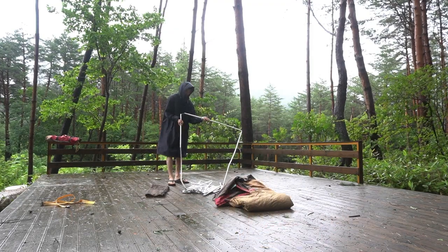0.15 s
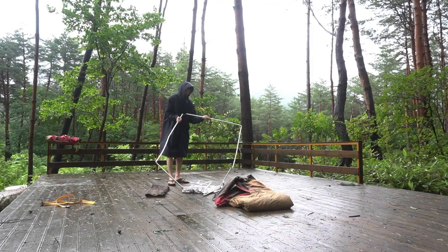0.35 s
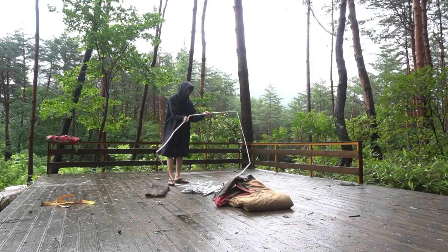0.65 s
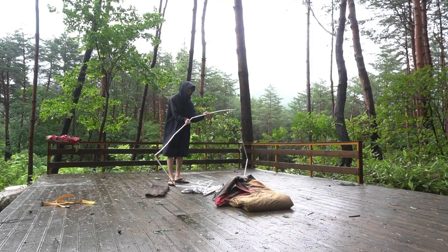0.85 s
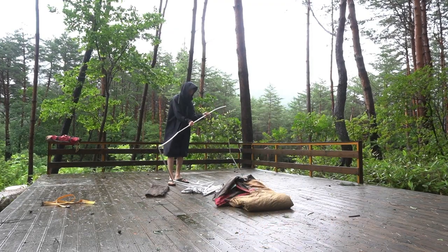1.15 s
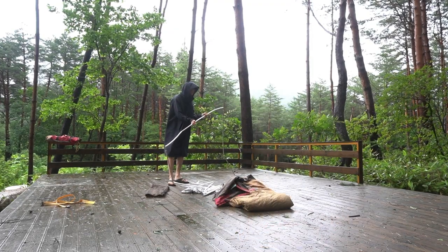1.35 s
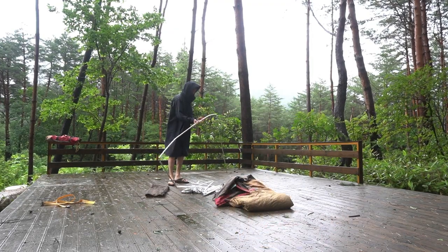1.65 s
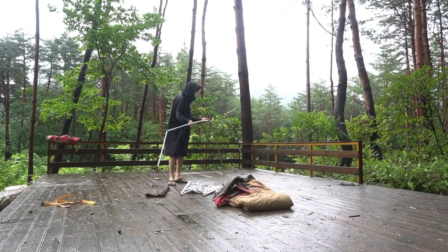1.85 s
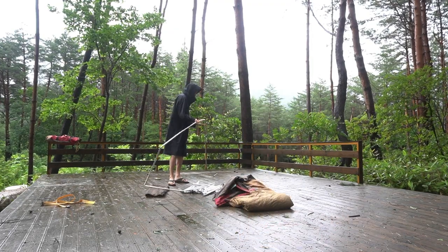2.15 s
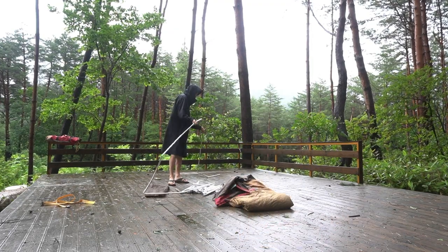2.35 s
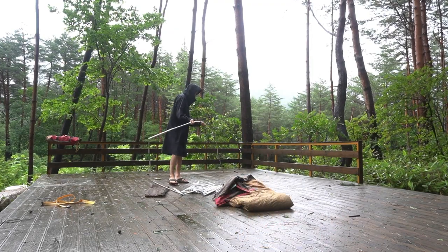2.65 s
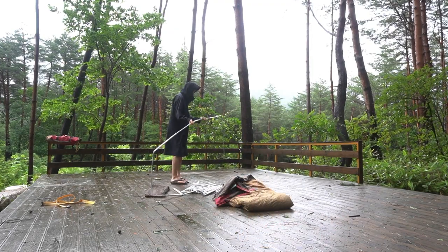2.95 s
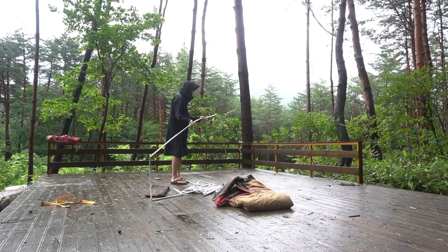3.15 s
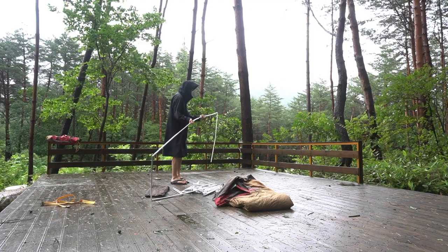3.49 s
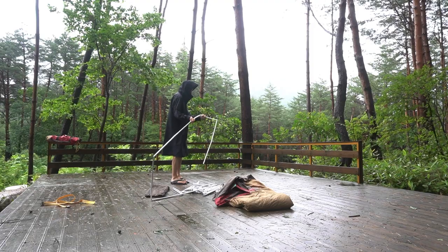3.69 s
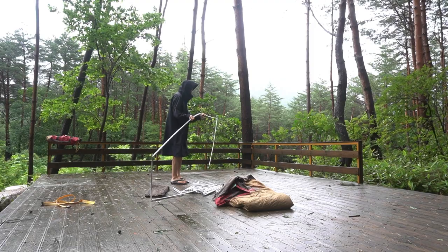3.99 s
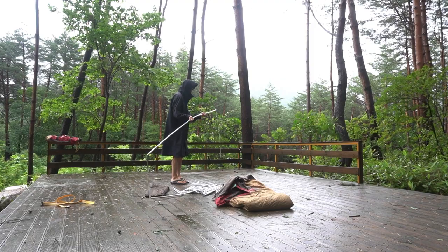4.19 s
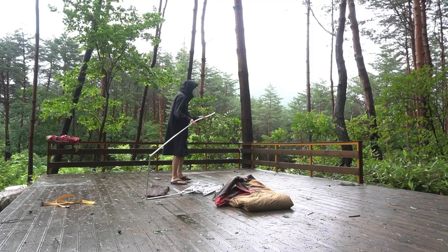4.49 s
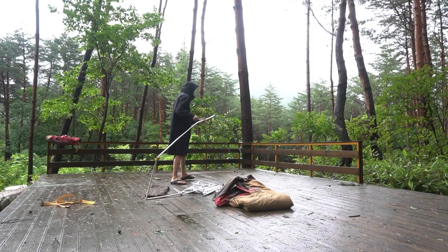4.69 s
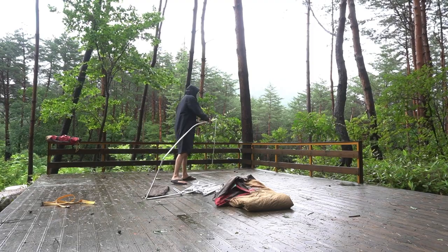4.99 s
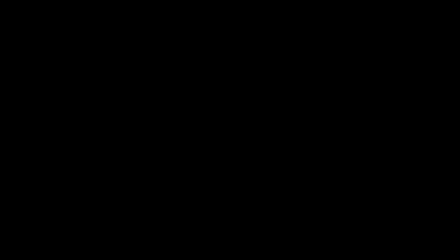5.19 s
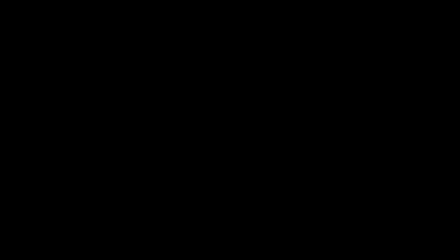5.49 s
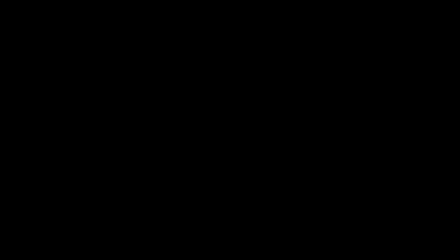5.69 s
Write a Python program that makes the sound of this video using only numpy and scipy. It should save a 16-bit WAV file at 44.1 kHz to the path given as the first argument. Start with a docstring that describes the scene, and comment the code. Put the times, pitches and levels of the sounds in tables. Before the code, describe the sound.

Even rain continues throughout, wide and diffuse. Bright tubular clicks come in quick irregular clusters, then a heavier clattering knock on hollow boards near the start, more ticks and snaps, firm knocks around three seconds, and one late clack before it thins out. Short dry scrapes link the contacts. Single drops slap wet wood close to the microphone, left and right, in an open wooded place with little reverberation.

```python
"""Steady rain on a forest and a wet wooden deck; single drops land close to the listener.
A few metres away a folding aluminium tent pole is put together: sections scrape, snap into sleeves and knock on boards.
Rain is coloured noise plus random damped pings; near drops are short decaying tones, spray and wood taps.
Scrapes are dense random slips, contacts are noise bursts exciting tube and board modes, the deck is resonant noise.
Noise responses convolved with the contacts make the metal ring on and the trees throw back a soft tail."""
import sys
import numpy as np
from scipy import signal
from scipy.fft import rfft, irfft
from scipy.io import wavfile

SR = 44100
rng = np.random.default_rng(int(sys.argv[2]) if len(sys.argv) > 2 else 0)


def wav_out(sig):
    """Save sig, one row per channel (or a flat mono array), as 16-bit PCM at SR to the path in sys.argv[1]."""
    wavfile.write(sys.argv[1], SR, np.round(np.clip(np.atleast_2d(sig).T, -1, 1) * 32767).astype(np.int16))


N = 257268
TIME = np.arange(N) / SR  # s

# normal modes of the aluminium tubes: (frequency [Hz], bandwidth [Hz], relative level [dB])
TUBE_MODES = [(1160, 83, -18), (2914, 950, 3), (4050, 480, 2), (6005, 120, 1), (7875, 230, 8.5),
              (9640, 340, 6), (11600, 220, -30), (14900, 410, 4.5), (14200, 440, 7.5), (15200, 520, -5.5)]
# normal modes of the deck boards: (frequency [Hz], bandwidth [Hz], relative level [dB])
BOARD_MODES = [(96, 8.9, -5), (243, 47, 7.5), (391, 77, 8), (494, 18, 7), (630, 120, 3.5), (1040, 130, -4),
               (1302, 86.7, 0.5)]
# likeness of left and right in sound from all round: (frequency [Hz], correlation [-1 to 1])
RAIN_CORRELATION = [(100, 0.98), (300, 0.98), (600, 0.93), (1200, 0.66), (2500, 0.48), (5000, 0.14),
                    (14000, 0.11)]
# likeness of left and right in the pole's sound: (frequency [Hz], correlation [-1 to 1])
POLE_CORRELATION = [(200, 1), (1200, 1), (4000, 0.67), (11000, .6)]
# edges of the thud, body, clack and ting registers: (frequency [Hz])
REGISTER_EDGES = [140, 700, 2400, 6500, 16500]
# a section drawn along its neighbour or into its sleeve: (time [s], length [s], relative level [dB])
SLIDING_STROKES = [(0.324, 0.19, -36), (0.599, 0.54, -40.5), (1.175, 0.21, -37.5), (1.371, 0.073, -30),
                   (1.516, .12, -43), (1.788, .07, -34.5), (1.9, 0.11, -48), (2.203, .16, -41),
                   (2.52, .13, -42), (2.667, 0.07, -38), (3.79, 0.13, -48), (4.168, .38, -43),
                   (4.627, 0.47, -51)]


def from_db(db):
    """Logarithmic level: 20 dB is a tenfold amplitude."""
    return 10 ** (np.asarray(db) / 20)


def rms_one(x):
    """Power normalisation: scale to unit root mean square."""
    return x / np.sqrt(np.mean(x ** 2) + 1e-20)


def at_hz(points, hz):
    """Logarithmic pitch scale: interpolate a table over log frequency."""
    frequency, value = np.transpose(points)
    return np.interp(np.log(np.maximum(hz, 1)), np.log(frequency), value)


def level(rows):
    """Amplitude envelope: gain over time from a curve in dB."""
    return from_db(np.interp(TIME, *np.transpose(rows)))


def band(x, low, high):
    """Causal band-pass filtering between two frequencies."""
    edges = [low, min(high, .47 * SR)]
    return signal.sosfilt(signal.butter(2, edges, "band", fs=SR, output="sos"), x)


def colour(x, spectrum):
    """Spectral shaping: weight each Fourier component by a gain in dB."""
    size = x.shape[-1]
    gain = from_db(at_hz(spectrum, np.fft.rfftfreq(size, 1 / SR)))
    return irfft(rfft(x) * gain, size)


def widen(pair, alike):
    """Interaural correlation: a sum and a difference of two unrelated signals set the likeness of the channels."""
    alike = np.clip(alike, 0, .999)
    common = np.sqrt(1 + alike) * pair[0]
    opposed = np.sqrt(1 - alike) * pair[1] * np.array([[1], [-1]])
    return common + opposed


def diffuse(pair, likeness):
    """Diffuse field: the correlation of the channels varies with frequency."""
    size = pair.shape[-1]
    alike = at_hz(likeness, np.fft.rfftfreq(size, 1 / SR))
    return irfft(widen(rfft(pair), alike), size)


def resonate(x, modes):
    """Modal superposition: parallel two-pole resonances, each damped according to its bandwidth."""
    out = 0
    for hz, width, db in modes:
        radius = np.exp(-np.pi * width / SR)
        zeros = np.array([1, 0, -1]) * (1 - radius * radius) / 2
        poles = [1, -2 * radius * np.cos(2 * np.pi * hz / SR), radius * radius]
        out = out + from_db(db) * signal.lfilter(zeros, poles, x)
    return out


def at_level(x, db):
    """Energy normalisation: the energy of a short sound, spread over 10 ms, sets its level."""
    return from_db(db) * x / np.sqrt(np.sum(x ** 2) / (2 * SR / 100) + 1e-20)


def add(out, s, sound, pan_db):
    """Level-difference stereophony: place a short sound in time, further left for a positive pan."""
    i = int(s * SR)
    panned = sound * from_db([[pan_db / 2], [-pan_db / 2]])
    out[:, i:i + sound.shape[1]] += panned[:, :N - i]


def pings(per_s, spread_db, sharpness):
    """Shot noise: two streams of random impacts, mostly small, each exciting one of twelve damped resonances."""
    sizes = from_db(spread_db * np.minimum(rng.exponential(1, (2, N)), 4)) * rng.choice([-1, 1], (2, N))
    impacts = sizes * (rng.random((2, N)) < per_s / SR)
    pitches = np.geomspace(450, 14000, 12)  # Hz
    dealt = rng.integers(0, len(pitches), (2, N))
    out = 0
    for k, hz in enumerate(pitches):
        own_impacts = impacts * (dealt == k) + 1e-18  # the offset keeps the filter clear of denormals
        out = out + resonate(own_impacts, [(hz, hz / sharpness, -10 * np.log10(hz))])
    return out


def swells(rows, attack_s, release_s):
    """Incoherent addition: overlapping events (time [s], length [s], level [dB]) add in power."""
    power = 0
    for s, length, db in rows:
        rise = np.clip((TIME - s) / attack_s, 0, 1)
        fall = np.exp(-np.maximum(TIME - s - length, 0) / release_s)
        power = power + (from_db(db) * rise * fall) ** 2
    return np.sqrt(power)


def rain(wash_db, patter_db):
    """Superposition of random impacts: far drops merge into a wash, nearer ones patter on leaves and boards."""
    # strength of the rainfall: (time [s], relative level [dB])
    rainfall = [(0, -40.5), (1, -39.5), (2, -39.5), (3, -41), (5.2, -41.5)]
    # spectrum of the far wash: (frequency [Hz], relative level per Hz [dB])
    wash_spectrum = [(24, -73), (40, -40.5), (130, -17), (167, -19), (199, -12), (297, -8), (363, -5),
                     (433, -6.5), (491, -2.5), (697, -1), (1300, -4), (2210, -3.5), (9450, -19),
                     (13800, -19.5), (16000, -23.5)]
    # weighting of the nearer patter: (frequency [Hz], gain [dB])
    patter_spectrum = [(400, -5.5), (900, -2.5), (2200, -4), (5000, -1), (14000, -12.5)]
    far = colour(rng.standard_normal((2, N)), wash_spectrum)
    near = colour(pings(per_s=1400, spread_db=4, sharpness=1.7), patter_spectrum)
    mixed = from_db(wash_db) * rms_one(far) + from_db(patter_db) * rms_one(near)
    return level(rainfall) * diffuse(mixed, RAIN_CORRELATION)


def near_drops(cycles, splash_db, splash_s, gain_db, tap_s, tap_db):
    """Damped oscillation: a drop slaps the water film, throws a little spray and taps the wood beneath."""
    # (time [s], relative slap level [dB], slap pitch [Hz], relative wood tap level [dB], left over right [dB])
    near_drop_rows = [(0.295, -44, 7400.0, -46, 18), (0.9328, -31, 10200.0, -58, -1),
                      (2.2415, -26.5, 7400, -43, 2), (2.342, -33, 6330, -39, 8),
                      (3.023, -34, 6230, -31.5, -4), (3.4434, -37.5, 4860, -34.5, -1),
                      (3.5932, -36, 2600, -40, -5), (3.683, -52, 2700, -33, 12),
                      (3.7256, -30, 9350, -45, -9), (4.0087, -43.5, 3240, -42, -18),
                      (4.2088, -24.5, 8600, -42, -5), (4.603, -21.5, 8900, -33, 2),
                      (4.9948, -33.5, 11200, -47, 2), (5.155, -43, 7100, -38, -10),
                      (5.1936, -46, 1980, -37, -6)]
    out, t = np.zeros((2, N)), np.arange(SR // 25) / SR
    for s, db, hz, wood_db, pan_db in near_drop_rows:
        slap = np.sin(2 * np.pi * hz * t) * np.exp(-t * hz / cycles)
        spray = band(rng.standard_normal((2, len(t))), hz / 2, hz * 2) * np.exp(-t / splash_s)
        tap = widen(rng.standard_normal((2, len(t))), .9) * np.exp(-t / tap_s)
        on_water = at_level(slap + from_db(splash_db) * spray, db + gain_db)
        on_wood = at_level(band(tap, 500, 2100), wood_db + tap_db)
        add(out, s, on_water + on_wood, pan_db)
    return out


def deck(gain_db):
    """Forced resonance: the hollow deck booms at its board modes as weight shifts on it."""
    # steps and blows that set the deck booming: (time [s], relative level [dB])
    thumps = [(.34, -51), (.45, -52.5), (.78, -42), (.94, -52), (1.819, -43.5), (2.0, -58), (2.16, -55.5),
              (2.32, -53), (2.5, -51.5), (3.06, -52), (3.2, -60), (4.38, -56.5), (4.52, -62)]
    # weighting of the boom: (frequency [Hz], gain [dB])
    boom_spectrum = [(25, -24), (55, -8), (85, -3), (150, -1.5), (210, -11), (400, -18), (1500, -59)]
    hold_s = 0.038
    load = rng.standard_normal(N)
    weight = swells([(s, hold_s, db) for s, db in thumps], attack_s=0.029, release_s=.09)
    boom = colour(load + resonate(load, BOARD_MODES), boom_spectrum)
    return from_db(gain_db) * weight * rms_one(boom)


def sliding(gain_db, clump_db, tube_db):
    """Stick-slip friction: tube ends catch and slip in clumps, each slip with a colour of its own."""
    # weighting of the scrape: (frequency [Hz], gain [dB])
    scrape_spectrum = [(400, -30), (1200, -20.5), (2800, -2.5), (4500, 1.5), (7000, -1), (11500, -1.5),
                       (14500, 1.5), (16000, -2)]
    slips = pings(per_s=9000, spread_db=2.5, sharpness=1.5)
    knots = np.arange(0, TIME[-1], 1 / 70)  # s
    clumps = from_db(clump_db * np.interp(TIME, knots, rng.standard_normal(len(knots))))
    excited = slips + from_db(tube_db) * resonate(slips, TUBE_MODES)
    scrape = colour(excited, scrape_spectrum) * clumps
    strokes = swells(SLIDING_STROKES, attack_s=0.021, release_s=0.087)
    return from_db(gain_db) * strokes * rms_one(diffuse(scrape, POLE_CORRELATION))


def tail(x, response, t60, onset_s, gain_db):
    """Reverberation as convolution: a dense response builds up, then falls by 60 dB per t60 seconds."""
    t = np.arange(response.shape[1]) / SR
    response = response * from_db(-60 * t / t60) * (1 - np.exp(-t / onset_s))
    response = response / np.sqrt(np.sum(response ** 2) / 2)
    return from_db(gain_db) * signal.fftconvolve(x, response, axes=1)[:, :N]


def forest_echo(pole):
    """Diffuse scattering: the trunks throw back a soft, dense tail."""
    # weighting of the scattered sound: (frequency [Hz], gain [dB])
    forest_spectrum = [(70, -8), (150, -5), (400, -18), (1200, -9), (3000, 3), (7000, 1.5), (16000, -6)]
    trunks = diffuse(colour(rng.standard_normal((2, SR)), forest_spectrum), RAIN_CORRELATION)
    return tail(pole, trunks, t60=0.4, onset_s=0.0062, gain_db=-11.5)


def tube_ringing(pole):
    """Modal density: the linked sections share many close modes, which ring on in clusters."""
    clusters = resonate(rng.standard_normal((2, SR)), TUBE_MODES)
    return tail(pole, clusters, t60=0.24, onset_s=0.0071, gain_db=-14.5)


def contacts(rows, edges, modes, crack_db, chatter_db, focus_db, sharpness, snap_db):
    """Impact excitation: a snap amid tiny impacts drives the modes; hardness sets the share of each register."""
    out, t = np.zeros((2, N)), np.arange(SR // 7) / SR
    for s, rise, decay, hz, *levels, pan_db in rows:
        push = np.minimum(t / max(rise, 1e-4), 1) * np.exp(-np.maximum(t - rise, 0) / max(decay, 1e-4))
        unevenness = from_db(chatter_db * rng.standard_normal(len(t)))
        chatter = push * rng.standard_normal((2, len(t))) * unevenness
        # the snap falls at the end of the rise
        chatter[0, int(np.clip(rise * SR, 0, len(t) - 1))] += from_db(snap_db)
        # the place that is hit and the grip on it favour one short, damped resonance
        favoured = (hz, hz / sharpness, focus_db)
        struck = from_db(crack_db) * chatter + resonate(chatter, [*modes, favoured])
        for low, high, db in zip(edges, edges[1:], levels):
            register = band(band(struck, low, high), low / 2, high * 2)
            sound = widen(register, at_hz(POLE_CORRELATION, np.sqrt(low * high)))
            add(out, s, at_level(sound, db), pan_db)
    return out


def rattles():
    """Random excitation by looseness: joints tick at random moments of each stroke, louder when it is harder."""
    ticks_per_s, over_stroke_db, spread_db = 18, 1, 1.5
    rise_s, decay_s, middle_hz, brightness_db = .0007, .002, 3000, -6
    events = []
    for s, length, db in SLIDING_STROKES:
        for when, size, pitch in rng.random((round(length * ticks_per_s), 3)):
            strength_db = db + over_stroke_db + spread_db * (2 * size - 1)
            hz = middle_hz * 2 ** (pitch - .5)
            events.append((s + when * length, rise_s, decay_s, hz, strength_db, brightness_db))
    return events


def clicks(events):
    """Impact spectrum of tube on tube: a higher pitch leaves less body, brightness raises the ting."""
    middle_body_db, loss_db_per_octave, middle_hz, thinnest_hz = -6.5, 8, 2900, 5000
    pan_db = -0.3  # left over right
    rows = []
    for s, rise, decay, hz, db, bright in events:
        body_db = middle_body_db - loss_db_per_octave * np.log2(min(hz, thinnest_hz) / middle_hz)
        rows.append((s, rise, decay, hz, db + body_db, db, db + bright, pan_db))
    return contacts(rows, REGISTER_EDGES[1:], TUBE_MODES, crack_db=3.0, chatter_db=3.0, focus_db=8.5,
                    sharpness=6, snap_db=12.5)


def knocks():
    """Coupled impact of pole and boards: weight feeds the thud, brightness tilts everything above the body."""
    # pole on the boards or butting home: (time [s], rise [s], decay [s], pitch [Hz], relative level [dB],
    # weight in the bass [dB], brightness [dB], left over right [dB])
    knock_rows = [(0.7818, 0.0019, .0057, 410, -23, 2, -5, 1),
                  (.786, 0.0063, 0.015, 1040, -22.5, -7, 3, -1),
                  (0.8214, 0.0039, 0.014, 1980, -28, -2, 1, 2),
                  (0.8658, 0.0023, 0.009, 1000, -22, -1.5, -8.5, 0.5),
                  (0.8826, 0.0039, 0.0079, 1040, -26, -14, -8, -.5),
                  (0.959, 0.0085, .02, 1130, -31.5, -6.5, -6.5, -1),
                  (1.3168, 0.0011, 0.0081, 1827, -20.5, -30.5, -1.5, -2.5),
                  (1.6423, 0.011, 0.0039, 2140, -23.5, -14.5, -2.5, -1),
                  (2.3635, 0.0023, 0.0078, 613, -34, -4, -6, -1),
                  (2.4453, 0.00083, 0.012, 630, -23, -6, -3.5, .5),
                  (2.481, 0.0064, 0.012, 1750, -24, -18, -6.5, -2.5),
                  (3.055, 0.0088, 0.019, 1210, -21.5, -8, -8, 1.5),
                  (3.1982, 0.00042, 0.0093, 1270, -24, -16, -3, 1),
                  (4.2643, 0.00036, 0.0057, 1830, -31, -28.5, -1, 7.5),
                  (4.375, 0.0063, 0.0053, 4130, -21.5, -11.5, -0.5, 2),
                  (4.39, 0.0039, 0.016, 670, -26.5, 0, -1, 1)]
    ting_db = -5  # added to the ting
    rows = []
    for *shape, db, weight, bright, pan_db in knock_rows:
        thud, body, clack, ting = db + weight, db, db + bright, db + 2 * bright + ting_db
        rows.append((*shape, thud, body, clack, ting, pan_db))
    return contacts(rows, REGISTER_EDGES, BOARD_MODES + TUBE_MODES, crack_db=-1.0, chatter_db=1.5,
                    focus_db=6.5, sharpness=2.8, snap_db=10.5)


def scene():
    """Linear superposition: the pole, its ringing and its echo among the trunks, in the rain."""
    # metal on metal: (time [s], rise [s], decay [s], pitch [Hz], relative level [dB], brightness [dB])
    click_rows = [(.0971, 0.00039, 0.013, 2770, -32, -5.5), (.3311, 0.0069, 0.02, 2930, -24, -5.5),
                  (.346, 0.0047, 0.028, 2930, -18.5, -10), (.3802, 0.0011, .003, 2850, -20.5, -14),
                  (.4322, .0013, 0.019, 2900, -24.5, -12.5), (.4904, 0.0019, 0.022, 3400, -21.5, -11.5),
                  (.588, 0.0062, .0026, 2930, -30.5, -16), (.619, 0.0084, 0.0037, 2914, -27.5, -10),
                  (.6612, .0027, 0.018, 3390, -32, -11), (.7125, .0047, 0.0073, 2500, -23.5, -3),
                  (.827, 0.0026, 0.023, 1890, -18.5, 0), (.9165, 0.0012, 0.0019, 7670, -22.5, 4.5),
                  (1.155, 0.0044, 0.0092, 14570, -26.5, 0), (1.1715, 0.0017, .001, 14570, -39, 7),
                  (1.243, 0.0046, 0.014, 2200, -27, -9), (1.3693, 0.0033, 0.0078, 7240, -17, -.5),
                  (1.6091, 0.0016, 0.012, 2410, -29.5, -16), (1.7782, 0.003, 0.0057, 2773, -22.5, -10),
                  (1.8053, 0.0023, 0.0069, 4380, -23.5, -7), (1.8258, 0.00077, 0.0054, 2320, -21, -4.5),
                  (1.8443, .0003, 0.04, 3000, -22, -15), (1.9114, 0.0036, 0.0078, 3810, -27.5, -8),
                  (1.9542, .0014, 0.0069, 1690, -29, -9.5), (1.98, 0.00083, .0037, 2000, -34, -4),
                  (2.0321, 0.00084, 0.015, 2280, -24, -6.5), (2.0912, .0008, 0.025, 1750, -28.5, -9.5),
                  (2.148, .002, 0.0095, 2610, -31, -13), (2.2143, 0.00082, .0039, 1900, -32, -13),
                  (2.3191, 0.00055, 0.0077, 3190, -32, -7), (2.5464, .001, 0.019, 3020, -17.5, -9),
                  (2.6734, .001, 0.013, 2310, -15, -6.5), (2.743, .003, 0.015, 4000, -26, -14),
                  (2.7609, 0.0037, .004, 3900, -25.5, -12), (3.781, 0.0032, 0.008, 2850, -29.5, -6.5),
                  (3.8354, .0018, 0.015, 5100, -30.5, -4.5), (4.4825, 0.0011, 0.0014, 3800, -27.5, -20),
                  (4.4865, 0.00089, 0.0028, 4200, -24, -18), (4.7052, .0042, 0.0043, 2600, -34, -9),
                  (5.086, 0.0032, 0.0054, 2800, -29.5, -8.5)]
    pole = from_db(3.0) * knocks() + from_db(0.5) * clicks(click_rows)
    ringing = tube_ringing(pole)
    echo = forest_echo(pole)
    drops = near_drops(cycles=3.3, splash_db=3.5, splash_s=0.00057, gain_db=-5.5, tap_s=0.0077, tap_db=-1.5)
    weather = drops + rain(wash_db=0.86, patter_db=-7.5)
    scraping = sliding(gain_db=-1.0, clump_db=2.5, tube_db=-4.0)
    handling = scraping + deck(gain_db=4.5) + clicks(rattles())
    return pole + ringing + echo + handling + weather


def record(dry):
    """Band limitation: the deep bass is rolled off, the sound stops short, and the top is cut."""
    stop_s, cutoff_hz = 5.222, 15900
    sound = signal.sosfilt(signal.butter(2, 60, "high", fs=SR, output="sos"), dry)
    sound = sound * (TIME < stop_s)
    return signal.sosfilt(signal.ellip(10, .2, 80, cutoff_hz, fs=SR, output="sos"), sound)


dry = scene()
out = record(dry)
wav_out(out)
```